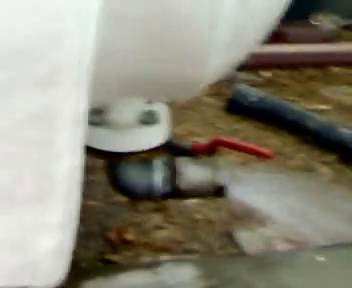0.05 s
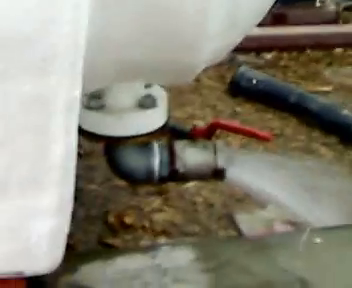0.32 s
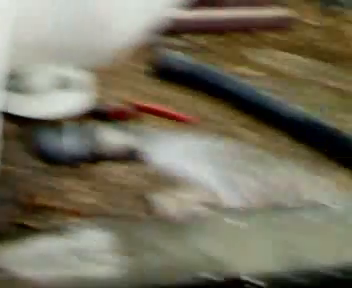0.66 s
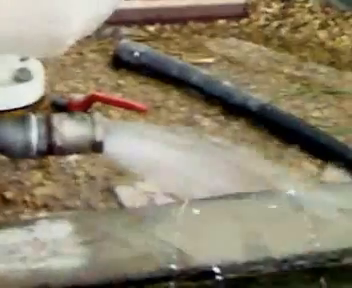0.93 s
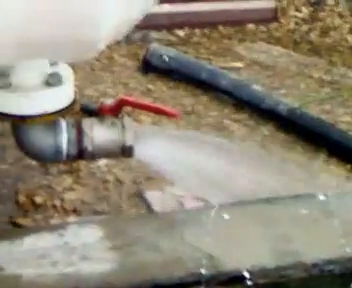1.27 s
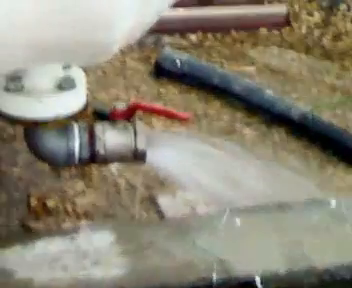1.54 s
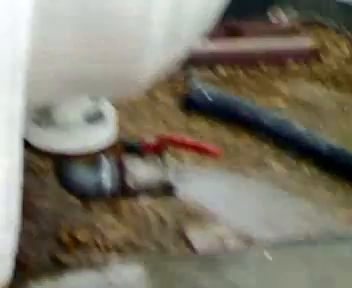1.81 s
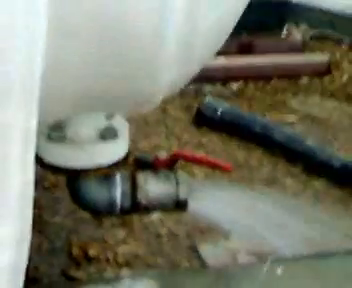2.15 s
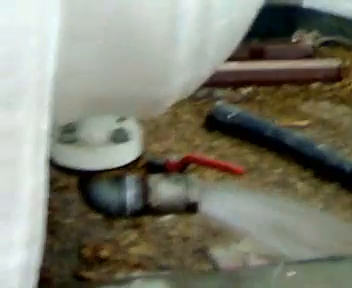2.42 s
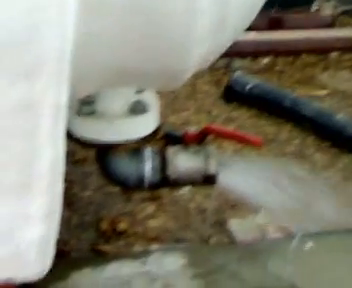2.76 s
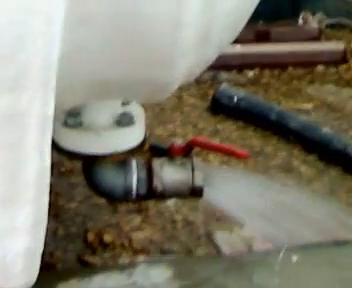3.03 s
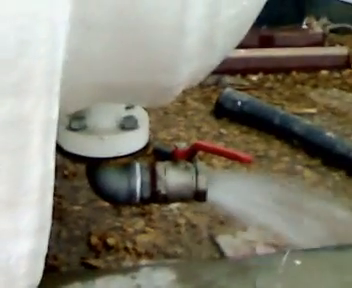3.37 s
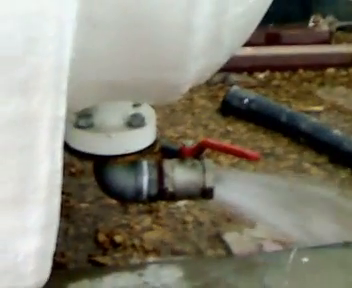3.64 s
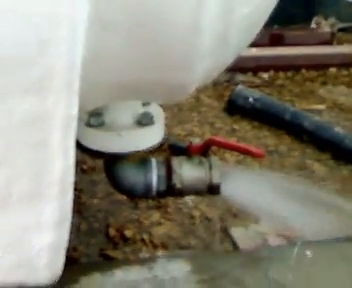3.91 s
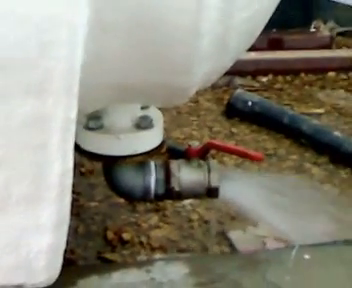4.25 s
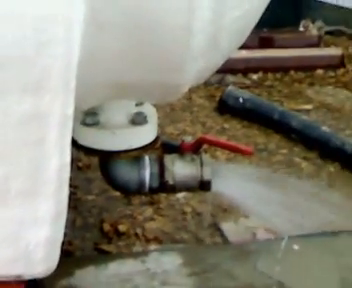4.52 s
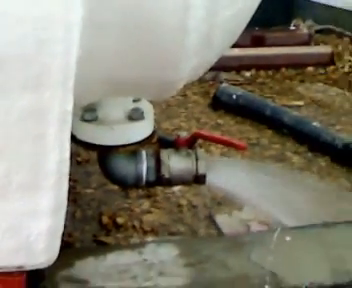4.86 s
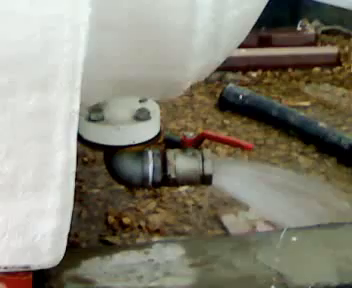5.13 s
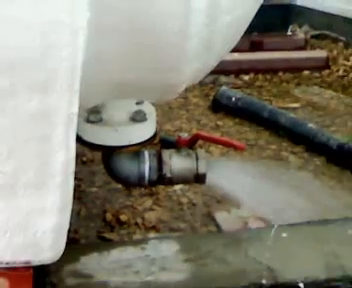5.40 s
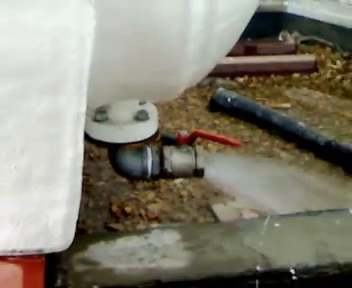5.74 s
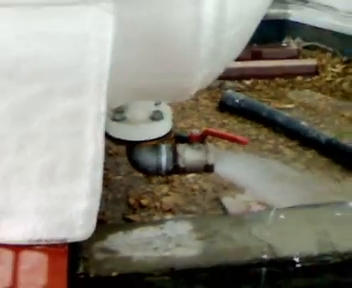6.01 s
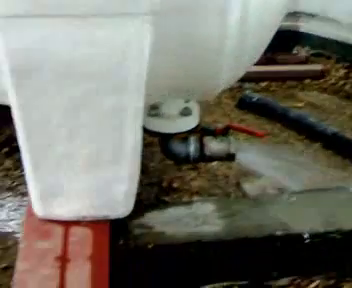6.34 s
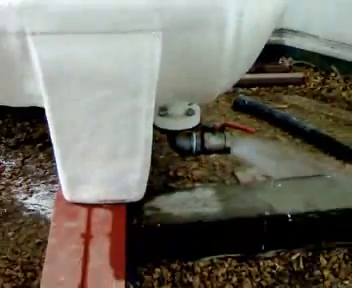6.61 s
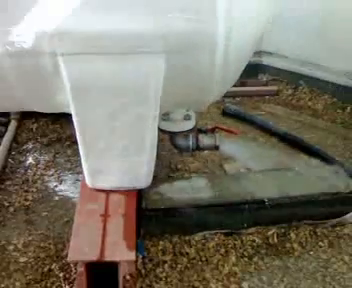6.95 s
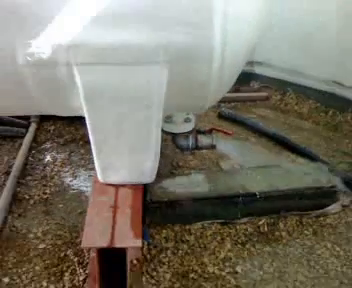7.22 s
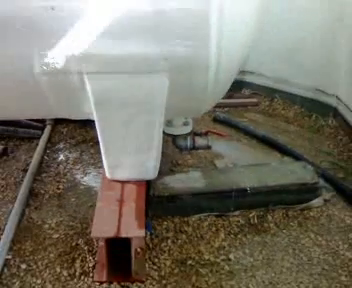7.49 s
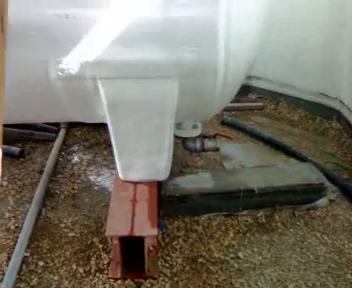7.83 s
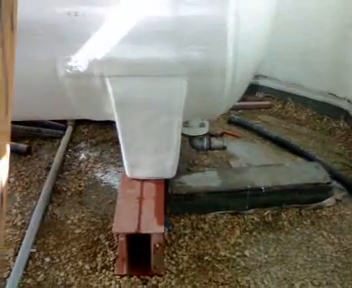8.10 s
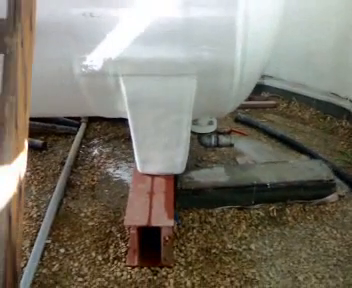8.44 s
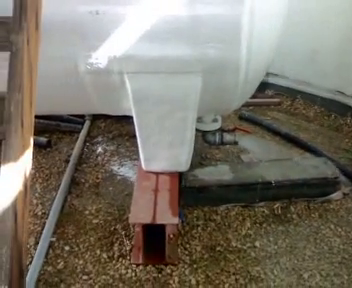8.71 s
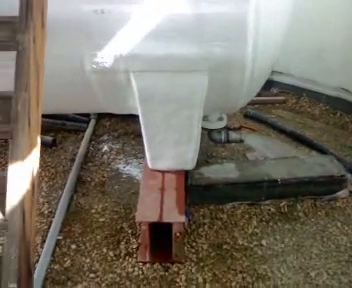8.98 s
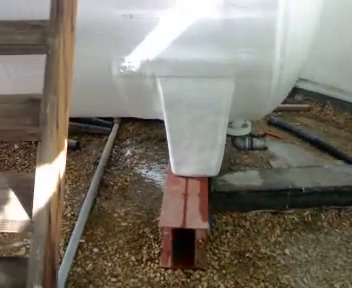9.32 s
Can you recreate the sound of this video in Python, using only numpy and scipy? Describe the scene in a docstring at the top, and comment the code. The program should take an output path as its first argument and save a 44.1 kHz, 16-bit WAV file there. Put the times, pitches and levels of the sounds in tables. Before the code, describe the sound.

A steady spray of water splatters on the ground while air sputters through the valve in sharp, bubbly spurts.

```python
"""A yard with a tank: pressurised water gushes from the drain valve and sprays over gravel and concrete.
Air comes with it in hissing spurts: swarms of small ringing bubbles spit through the valve,
and single big ones pop. Slab, tank and wall answer closely.
A pump motor hums behind the low rumble of the flow."""
import sys
import numpy as np
from scipy import signal
from scipy.fft import rfft, irfft, next_fast_len
from scipy.io import wavfile
from scipy.ndimage import uniform_filter1d, map_coordinates

SR = 44100
rng = np.random.default_rng(int(sys.argv[2]) if len(sys.argv) > 2 else 0)


def store_wav(level_fs):
    """Save 16-bit WAV to argv[1]."""
    pcm = np.round(np.clip(np.atleast_2d(level_fs), -1, 1) * 32767)
    wavfile.write(sys.argv[1], SR, pcm.T.astype(np.int16))


N = 412776


def amp(db):
    """Decibels to gain."""
    return 10 ** (np.asarray(db) / 20)


def unit(x):
    """x at rms 1."""
    return x / np.sqrt(np.mean(x ** 2) + 1e-20)


def curve(rows):
    """(time_s, value) points to one value per sample."""
    return np.interp(np.arange(N) / SR, *np.transpose(rows))


def wobble(rate_hz):
    """Smooth random curve with knots at rate_hz."""
    knots = rng.standard_normal(int(N * rate_hz / SR) + 4)
    return map_coordinates(knots, [np.arange(N) * rate_hz / SR])


def filtered(x, response):
    """x filtered by response(hz)."""
    size = next_fast_len(N + SR // 2)
    return irfft(rfft(x, size) * response(np.fft.rfftfreq(size, 1 / SR)), size)[:N]


def coloured(x, spectrum):
    """x shaped by (freq_hz, gain_db) points on a log axis; rms 1."""
    freq_hz, gain_db = np.transpose(spectrum)
    return unit(filtered(x, lambda hz: amp(np.interp(np.log(hz + 1), np.log(freq_hz), gain_db))))


def resonant(x, modes):
    """x plus the ring of the modes it excites."""
    return filtered(x, lambda f: 1 + sum(
        amp(db) * 1j * f * width / (hz * hz - f * f + 1j * f * width) for hz, width, db in modes))


def turbulence(patchy_db):
    """White noise with drifting patches of random gain; rms 1."""
    bins = signal.stft(rng.standard_normal(N), nperseg=512)[2]
    patches = uniform_filter1d(rng.standard_normal(bins.shape), size=6, axis=0)
    patches = unit(uniform_filter1d(patches, size=12, axis=1))
    return unit(signal.istft(bins * amp(patchy_db * patches), nperseg=512)[1][:N])


# motor hum: shaft_multiple, level_db
PUMP_HARMONICS = [(1, -55.5), (2, -42.5), (4, -50), (6, -51.5), (7, -54.5), (8, -46.5), (9, -56.5)]
# fade as the listener steps back: time_s, gain_db
PUMP_GAIN = [(0, 1.5), (5, 1.5), (7.5, 0.5), (9.36, -0.5)]
def pump(shaft_hz=58.18, waver_db=0.6):
    """A motor hums on multiples of its nearly steady shaft speed."""
    turns = np.cumsum(shaft_hz * (1 + 0.00042 * wobble(2))) / SR
    hum = sum(amp(db + waver_db * wobble(4)) * np.sin(2 * np.pi * (multiple * turns + rng.random()))
              for multiple, db in PUMP_HARMONICS)
    return np.sqrt(2) * amp(curve(PUMP_GAIN)) * hum


# flow rumble: freq_hz, gain_db
RUMBLE_SPECTRUM = [(12, -27), (25, -7.5), (45, -6), (80, -11.5), (110, -3.5), (165, 2.5), (210, -6),
                   (270, -4), (340, -6), (390, -11.5), (430, -6), (520, -14.5), (800, -18.5), (1500, -35)]
# flow strength: time_s, level_db
RUMBLE_LEVEL = [(0.0, -38), (0.49, -40.5), (0.75, -37.5), (2.61, -40), (2.68, -32), (2.74, -38),
                (8.86, -38.5), (9.31, -34.5), (9.36, -38)]
def rumble(gain_db=1):
    """The turbulent flow rumbles."""
    return amp(curve(RUMBLE_LEVEL) + gain_db) * coloured(turbulence(patchy_db=0.5), RUMBLE_SPECTRUM)


# water on gravel and concrete: freq_hz, gain_db
SPRAY_SPECTRUM = [(200, -31), (550, -10.5), (720, -10.5), (900, -5.5), (1300, -5), (1500, -3), (2100, 1.5),
                  (3000, 0.5), (4500, -3), (5800, -6), (7200, -16), (8000, -49)]
# landing strength: time_s, level_db
SPRAY_LEVEL = [(0.0, -32.5), (1.3, -31), (1.36, -32), (4.46, -32), (4.48, -29.5), (4.69, -34),
               (5.53, -30.5), (5.63, -33.5), (5.76, -30), (5.99, -33.5), (6.8, -31.5), (7.09, -33),
               (7.14, -31), (8.55, -32.5), (8.73, -30), (8.78, -33), (9.02, -30), (9.36, -33.5)]
# hollow under the tank: freq_hz, width_hz, gain_db
HOLLOW_MODES = [(672, 20, 5), (790, 33, 6.5), (1026, 14, -1.5), (1172, 34, -4.5), (1378, 35, -4),
                (1479, 50, -1), (1665, 42, -2), (1855, 43, -6.5)]
def spray(gain_db=5, surge_db=0.5, drops_per_s=700, drop_gain=0.43):
    """Spray and single drops patter on the ground and ring the hollow under the tank."""
    level_db = curve(SPRAY_LEVEL) + surge_db * wobble(7) + gain_db
    drops = unit(rng.standard_normal(N) * (rng.random(N) < drops_per_s / SR))
    patter = coloured(turbulence(patchy_db=1.5) + drop_gain * drops, SPRAY_SPECTRUM)
    return amp(level_db) * unit(resonant(patter, HOLLOW_MODES))


# slab, tank and wall: delay_s, gain_db
YARD_ECHOES = [(.0024, -25.5), (.0032, -11), (.0056, -39.5), (.0087, -19.5), (0.01, -11), (.0171, -23),
               (.0225, -15), (0.026, -28)]
def yard(x, tail_db=-7.5, t60_s=0.25):
    """Direct sound, echoes off the nearest surfaces and a short diffuse tail."""
    t = np.arange(SR // 2) / SR
    tail = rng.standard_normal(len(t)) * amp(-60 * t / t60_s) * (1 - np.exp(-t / 0.00096))
    response = amp(tail_db) * tail / np.linalg.norm(tail)
    response[0] = 1
    for delay_s, db in YARD_ECHOES:
        response[int(delay_s * SR)] += amp(db)
    return signal.fftconvolve(x, response)[:N]


# air in the jet: start_s, hold_s, level_db, pitch_hz
AIR_SPURTS = [(0.132, 0.18, -29.5, 4760), (0.402, 0.077, -20.5, 4400), (0.469, 0.031, -16.5, 3680),
              (0.58, 0.03, -24.5, 4720), (0.734, 0.041, -21.5, 4100), (0.967, 0.076, -22.5, 4260),
              (1.072, 0.11, -23.5, 3125), (1.198, 0.041, -22.0, 3330), (1.239, 0.073, -24, 3630),
              (1.413, 0.0054, -24, 4500), (1.482, 0.036, -31, 4370), (1.577, 0.036, -28.5, 4340.0),
              (2.003, 0.055, -23.5, 3700), (2.106, 0.007, -25, 4260), (2.205, 0.033, -26, 3510),
              (2.249, 0.016, -28.5, 3110), (2.479, 0.13, -25.5, 4620), (2.575, 0.041, -22.5, 2800),
              (2.662, 0.031, -24, 3080), (2.713, 0.17, -29, 4220), (2.784, 0.028, -18, 3150),
              (2.873, 0.0063, -21.5, 3660), (2.974, 0.039, -27, 4110), (3.047, 0.11, -25, 3620),
              (3.157, 0.034, -24.5, 3250), (3.217, 0.022, -19, 3165), (3.343, 0.025, -34, 4000),
              (3.484, 0.012, -20.5, 4020), (3.626, 0.053, -21, 4560), (3.702, 0.017, -21, 4510.0),
              (3.759, 0.015, -18, 3620), (3.806, 0.083, -21.5, 4220), (3.949, 0.029, -22, 4050),
              (3.98, 0.02, -18, 2950), (4.054, 0.14, -22, 4010), (4.116, 0.023, -22, 3190),
              (4.333, 0.069, -23.5, 3820), (4.412, 0.052, -19.5, 3320), (4.516, 0.023, -22.5, 3860),
              (5.188, 0.02, -25, 3950.0), (5.272, 0.049, -19.5, 4140), (5.386, 0.092, -26.5, 3100.0),
              (5.442, 0.005, -20, 4170), (5.541, 0.033, -19, 3430), (5.629, 0.029, -23.4, 4240),
              (5.713, 0.064, -22.5, 2960), (5.796, 0.005, -25.5, 3740), (5.893, 0.08, -25, 3670),
              (6.036, 0.026, -23, 4410), (6.102, 0.0034, -24, 4920.0), (6.2, 0.027, -23, 3940),
              (6.271, 0.005, -25, 4510), (6.376, 0.089, -23.5, 3290), (6.453, 0.044, -20.2, 3570.0),
              (6.536, 0.048, -25.5, 3940), (6.593, 0.0044, -17, 3120), (6.683, 0.066, -22, 4010),
              (6.779, 0.047, -21, 3590.0), (6.874, 0.005, -18, 4120), (6.901, 0.025, -21, 3550),
              (6.986, 0.005, -23.5, 4500), (7.102, 0.076, -28, 3910), (7.278, 0.068, -27.5, 3930),
              (7.398, 0.145, -24, 4420), (7.521, 0.011, -20.5, 3380), (7.57, 0.1, -24, 4320),
              (7.763, 0.059, -22.5, 3250), (7.805, 0.025, -21.5, 3410), (7.963, 0.04, -25.5, 4500),
              (8.105, 0.12, -26, 4020), (8.191, 0.082, -26, 4360.0), (8.308, 0.028, -21, 3560),
              (8.564, 0.097, -27.4, 4590), (8.656, 0.05, -23.5, 3980), (8.809, 0.005, -24.5, 3940),
              (8.875, 0.096, -24.5, 5120), (8.935, 0.063, -23, 3310), (9.207, 0.021, -18.5, 3570),
              (9.325, 0.05, -24.6, 3390)]
def air(attack_s=0.015, release_db_per_s=167, sag_per_s=1.0, sag_s=0.089,
        trickle_db=-41.5, trickle_hz=3700):
    """Spurts add up over a trickle of air; returns power-weighted bubble pitch and total level."""
    t = np.arange(N) / SR
    power = amp(trickle_db + 1.5 * wobble(11)) ** 2
    weighted_pitch = power * trickle_hz
    for start_s, hold_s, db, hz in AIR_SPURTS:
        span = slice(max(int((start_s - attack_s) * SR), 0), int((start_s + hold_s + 0.5) * SR))
        age_s = t[span] - start_s
        rise = np.clip(1 + age_s / attack_s, 0, 1)
        spurt_power = (rise * amp(db - release_db_per_s * np.maximum(age_s - hold_s, 0))) ** 2
        sink = np.exp(-sag_per_s * np.clip(age_s, 0, sag_s))  # growing bubbles drop in pitch
        power[span] += spurt_power
        weighted_pitch[span] += spurt_power * hz * sink
    return weighted_pitch / power, 10 * np.log10(power)


# jet tearing apart: freq_hz, gain_db
HISS_SPECTRUM = [(600, -19), (1600, -4), (2500, 2.5), (3600, 0.5), (4600, 1), (5500, 2.5), (6300, -9.5),
                 (7200, -13.5), (8000, -39)]
def hiss(air_db, gain_db=-8.5):
    """Escaping air shreds the jet into mist, in a fast flutter."""
    flutter_db = 2.2 * wobble(170)
    return amp(air_db + gain_db + flutter_db) * coloured(turbulence(patchy_db=3.5), HISS_SPECTRUM)


def bubbles(start_s, gain, pitch_hz, cycles, sag):
    """Each bubble swells and dies within a few cycles; its pitch sags as it expands out of the pressure."""
    offsets = np.arange(SR // 140)
    turns = pitch_hz[:, None] * offsets / SR
    age = turns / cycles[:, None]
    envelope = (1 - np.exp(-(turns / 1.3) ** 2)) * np.exp(-age ** 3)
    phase = (1 - sag) * turns + 2 * sag * cycles[:, None] * (1 - np.exp(-age))
    ring = gain[:, None] * envelope * np.sin(2 * np.pi * (phase + rng.random((len(pitch_hz), 1))))
    samples = np.maximum(start_s * SR, 0).astype(int)[:, None] + offsets
    return np.bincount(samples.ravel(), ring.ravel(), N)[:N]


def swarm(centre_hz, rate_per_s, spread, cycles, scatter_db=3.5, lowest_hz=2560):
    """Bubbles of random size ring at random moments; rms 1."""
    count = int(rate_per_s * N / SR)
    onsets = rng.integers(0, N, count)
    tune, size, life = rng.standard_normal((count, 3)).T
    # the bore limits bubble size, hence the lowest pitch
    pitch_hz = lowest_hz + np.abs(centre_hz[onsets] * np.exp(spread * tune) - lowest_hz)
    gain = amp(scatter_db * np.minimum(size, 1.6))
    return unit(bubbles(onsets / SR, gain, pitch_hz, cycles * np.exp(0.4 * life), sag=0.056))


def spurts(pitch_hz, air_db, gurgle_db=-6, crackle_db=-12):
    """A spurt's bubbles are alike in size; the valve shears finer, brighter ones off them."""
    gurgle = swarm(pitch_hz, rate_per_s=600, spread=0.085, cycles=8)
    crackle = swarm(np.full(N, 4400), rate_per_s=260, spread=0.12, cycles=5.5)
    return amp(air_db + gurgle_db) * gurgle + amp(air_db + crackle_db) * crackle


def spits(air_db, rate_per_s=22, gain_db=9, drive_limit_db=-11, scatter_db=2, centre_hz=3950):
    """Mid-size bubbles burst at random, as hard as the air drives them."""
    count = int(rate_per_s * N / SR)
    onsets = rng.integers(0, N, count)
    size, tune = rng.standard_normal((count, 2)).T
    drive_db = np.minimum(air_db[onsets] + gain_db, drive_limit_db)
    gain = amp(drive_db + scatter_db * np.minimum(size, 1))
    pitch_hz = centre_hz * np.exp(0.074 * tune)
    return bubbles(onsets / SR, gain, pitch_hz, cycles=np.full(count, 8), sag=0.17)


# biggest bubbles: start_s, level_db, pitch_hz
BIG_BUBBLES = [(0.4114, -9, 4150), (0.4274, -6, 4230), (0.5834, -6, 4570), (0.9752, -11, 4030),
               (1.0236, -5, 4000), (1.1334, -10.5, 4070), (1.2017, -11, 3510), (1.2774, -10.5, 3450),
               (1.5968, -11, 4030), (2.0014, -12, 3970), (2.0318, -9, 3500), (2.1026, -4, 4100),
               (2.2189, -11, 3600), (2.5945, -11, 4200), (2.7746, -10, 3900), (2.803, -8, 3900),
               (2.8838, -7.5, 3470), (2.9736, -10, 4200), (3.1667, -7, 3484), (3.2121, -14, 3320),
               (3.3613, -14, 3970), (3.496, -6, 3900), (3.6641, -4, 4180), (3.7024, -9, 4270),
               (3.7564, -5, 3920), (3.7684, -4.5, 3430), (3.8197, -10, 4210), (3.8304, -8, 4230),
               (3.9479, -5.5, 3960), (3.9764, -10, 3490), (4.3575, -3, 3940), (4.4353, -2.5, 3490),
               (5.2789, -1, 3960), (5.4415, -1.5, 3970), (5.6416, -9.5, 4400), (5.7932, -10, 3590),
               (5.8965, -7, 3370), (5.9194, -5, 3880), (5.9783, -6.5, 4160), (6.2158, -8.5, 4000),
               (6.2701, -6, 4360), (6.4787, -5, 3490), (6.551, -4, 3860), (6.8693, -10, 4250),
               (6.9082, -10, 3550), (7.2674, -9.5, 3680), (7.6256, -7, 4180), (8.1903, -5.5, 4260),
               (8.5649, -11, 4400), (8.6827, -8.5, 3800), (8.8159, -13, 3630)]
def pops(gain_db=-1):
    """Big bubbles leave the valve one by one with a sharp spit."""
    start_s, level_db, pitch_hz = np.transpose(BIG_BUBBLES)
    cycles = 9.5 * np.exp(0.035 * rng.standard_normal(len(start_s)))
    return bubbles(start_s, amp(level_db + gain_db), pitch_hz, cycles, sag=0.14)


# steel elbow and valve: freq_hz, width_hz, gain_db
VALVE_MODES = [(2653, 70, 5.5), (3033, 90, 2), (3500, 39, -16.5), (4270, 29, -15), (4200, 80, -27)]
def valve(pitch_hz, air_db):
    """Bubbles of all sizes ring the steel elbow and valve."""
    return resonant(spurts(pitch_hz, air_db) + spits(air_db) + pops(), VALVE_MODES)


def scene():
    """Valve and hiss echo in the yard, over spray, rumble and pump."""
    pitch_hz, air_db = air()
    outlet = valve(pitch_hz, air_db) + hiss(air_db)
    return (yard(outlet) + spray() + rumble() + pump())[None]


def record(dry, ceiling=0.85, cutoff_hz=7550):
    """Soft peak clipping, then a steep low-pass."""
    rounded = dry[0] / (1 + (dry[0] / ceiling) ** 4) ** 0.25
    return filtered(rounded, lambda hz: 1 / np.sqrt(1 + (hz / cutoff_hz) ** 160))[None]


dry = scene()
out = record(dry)
store_wav(out)
```